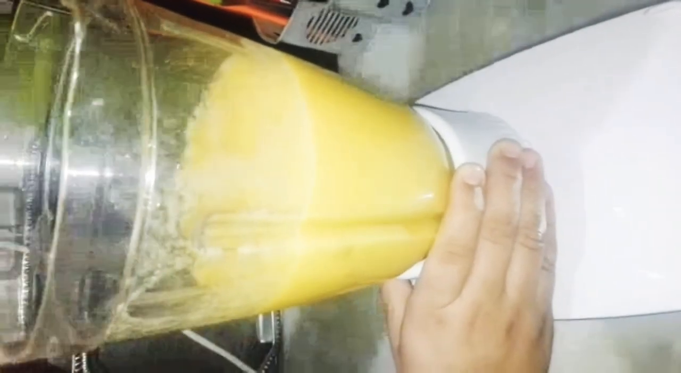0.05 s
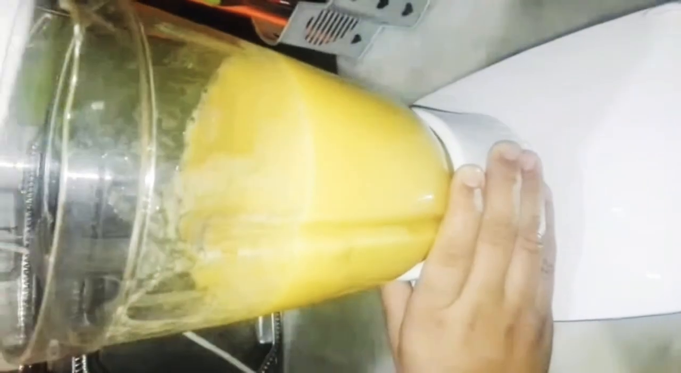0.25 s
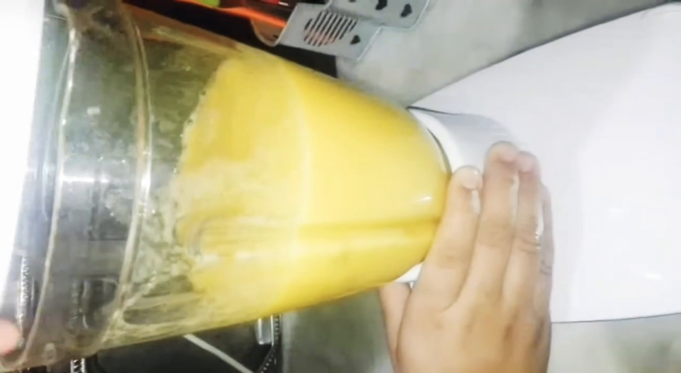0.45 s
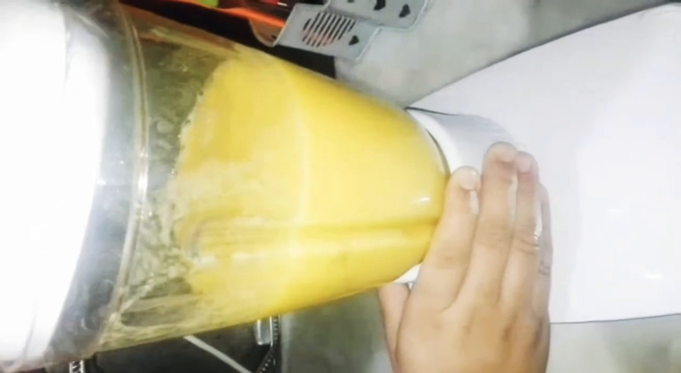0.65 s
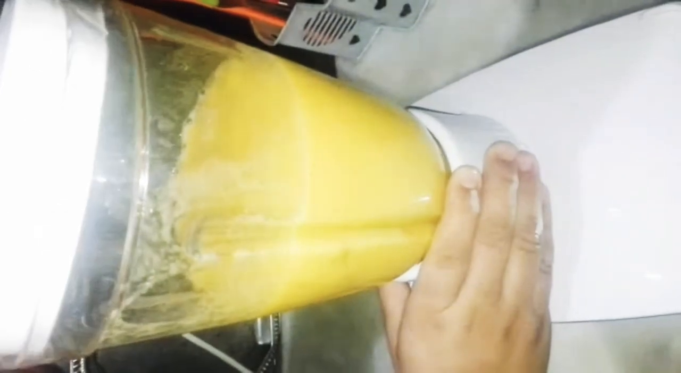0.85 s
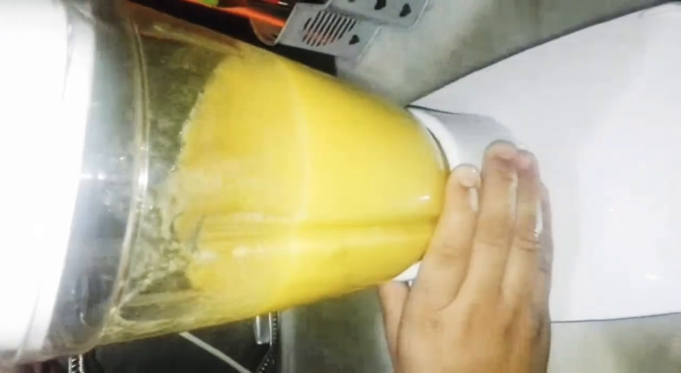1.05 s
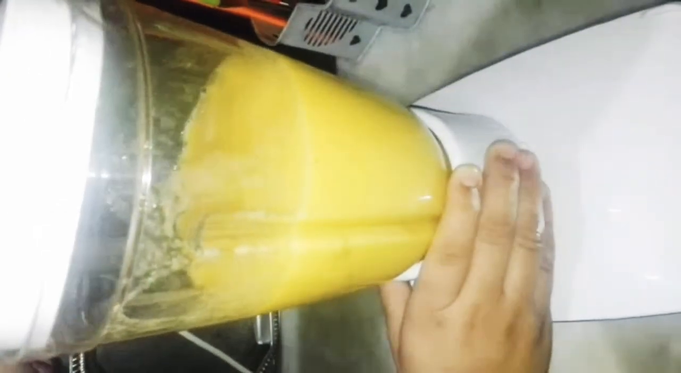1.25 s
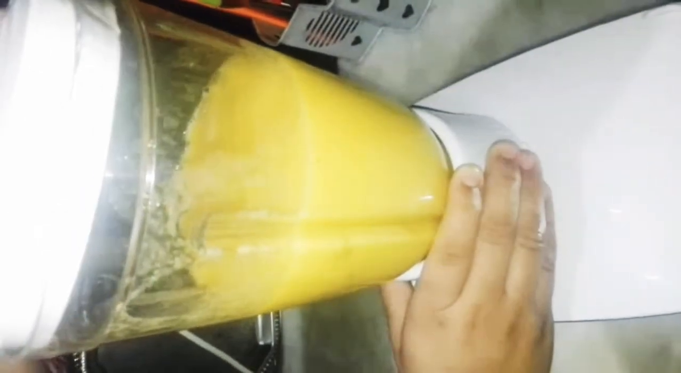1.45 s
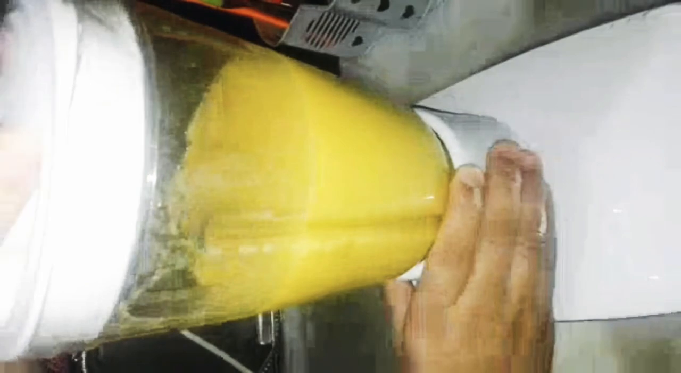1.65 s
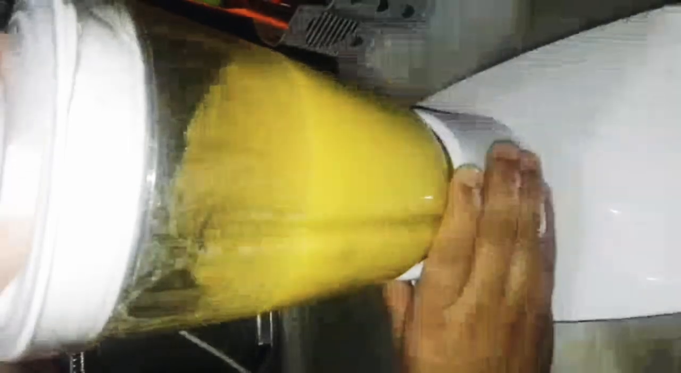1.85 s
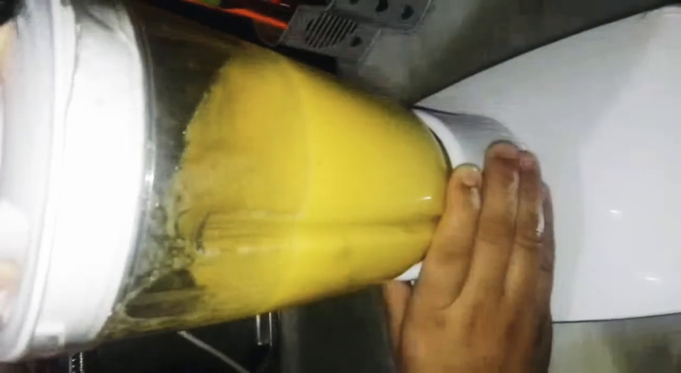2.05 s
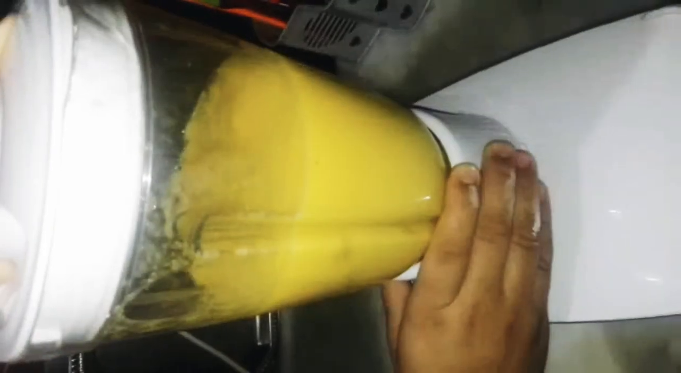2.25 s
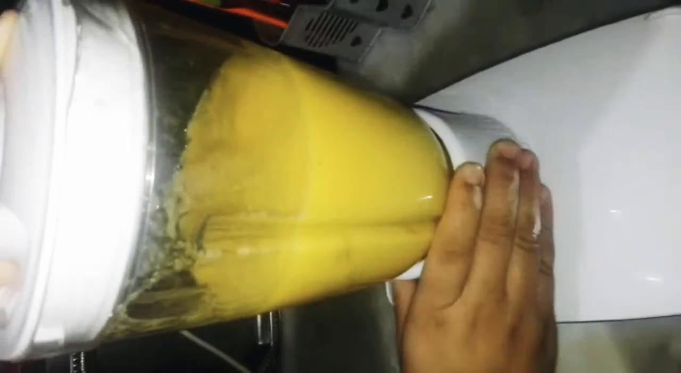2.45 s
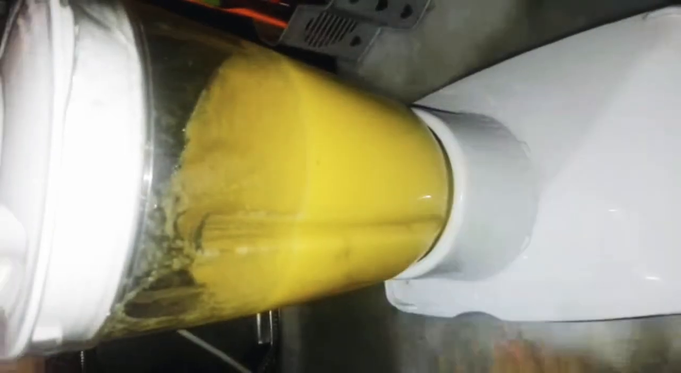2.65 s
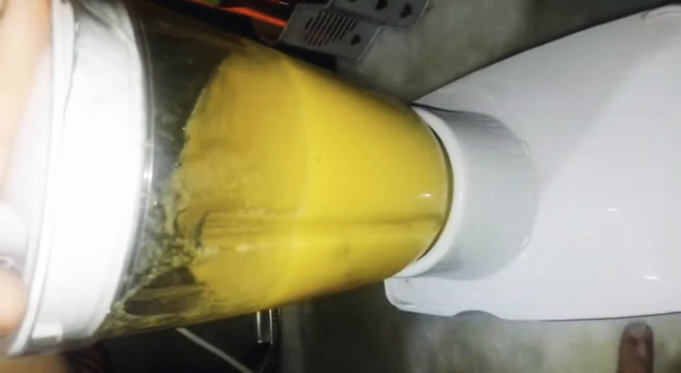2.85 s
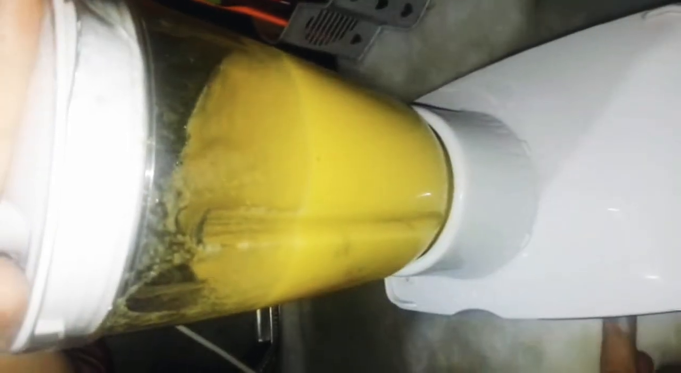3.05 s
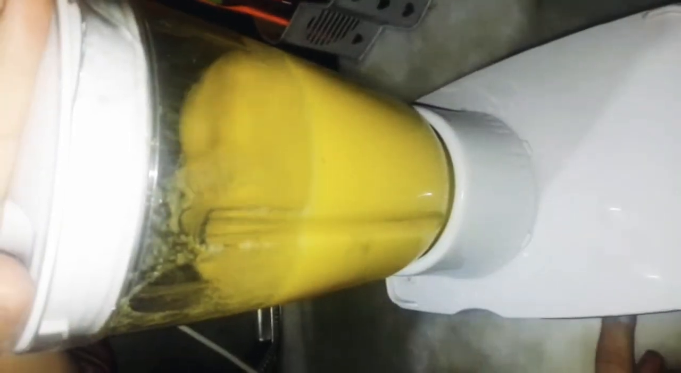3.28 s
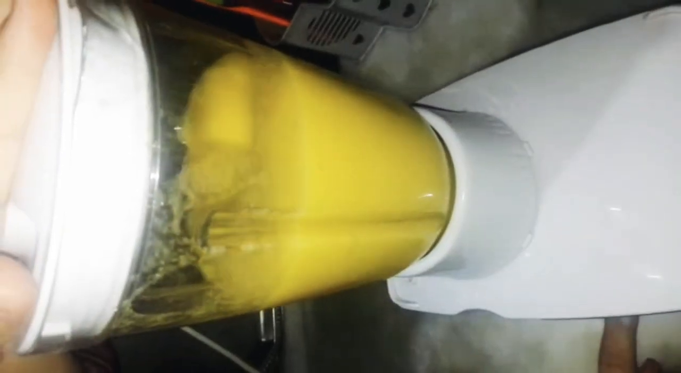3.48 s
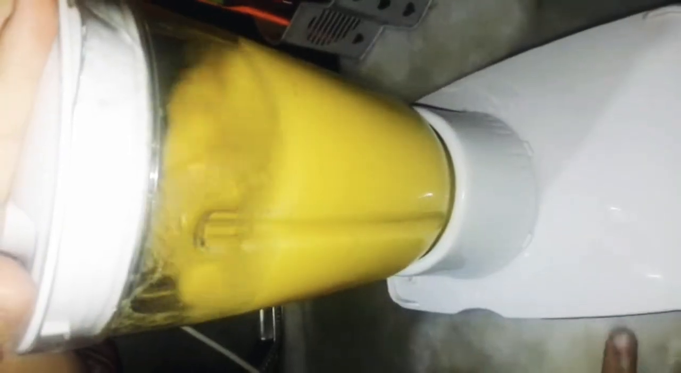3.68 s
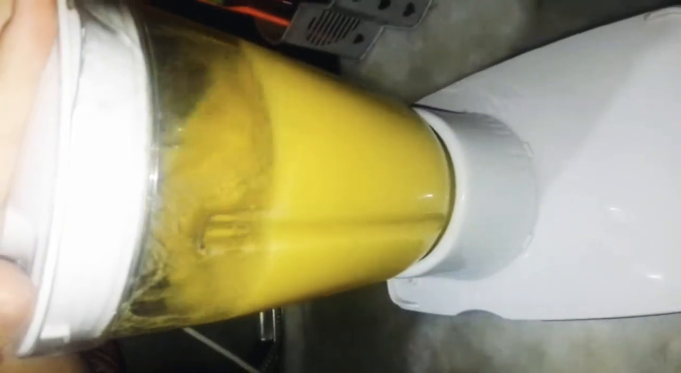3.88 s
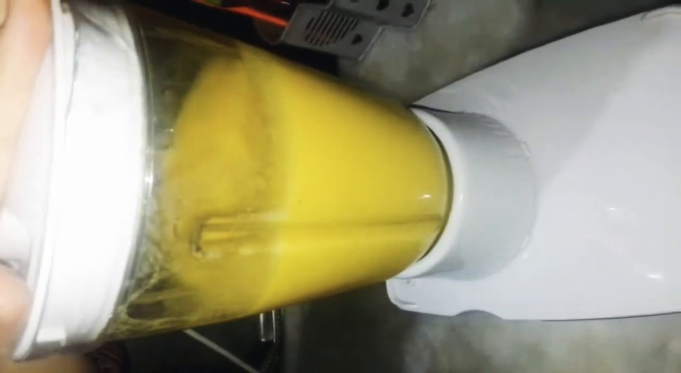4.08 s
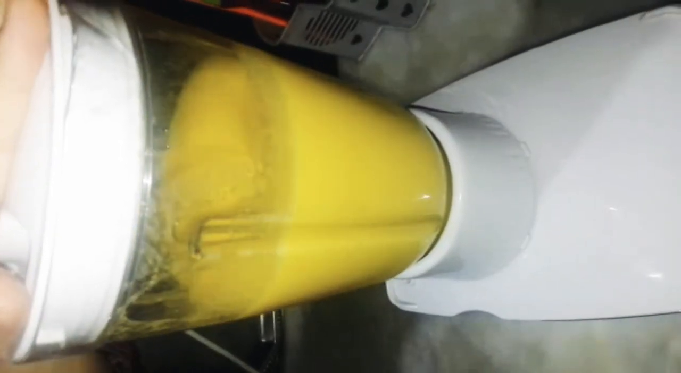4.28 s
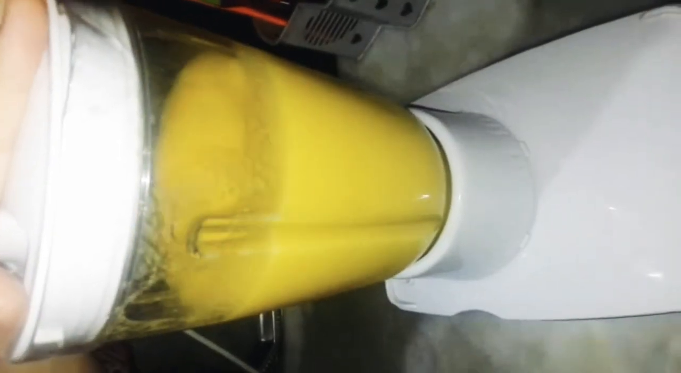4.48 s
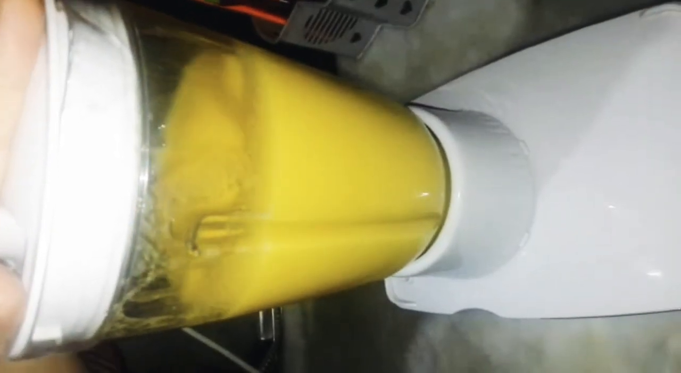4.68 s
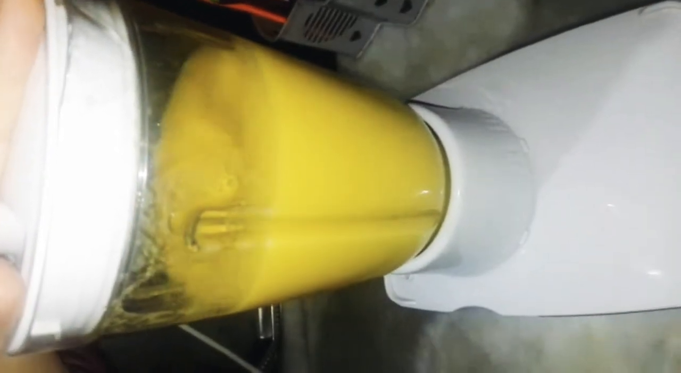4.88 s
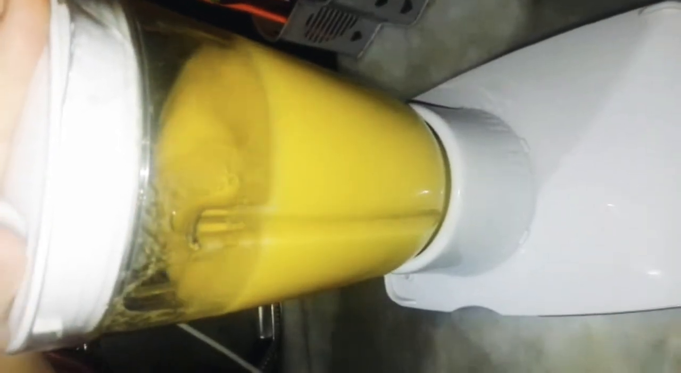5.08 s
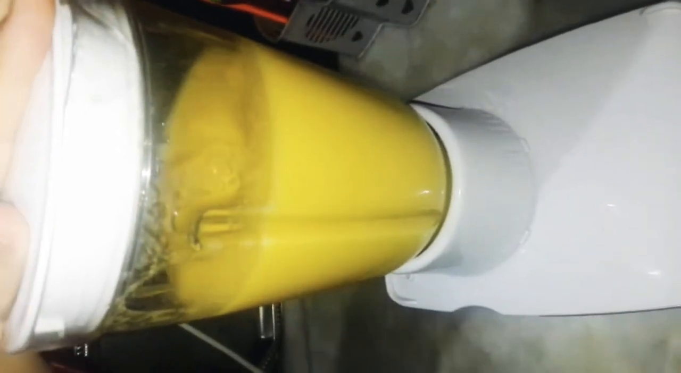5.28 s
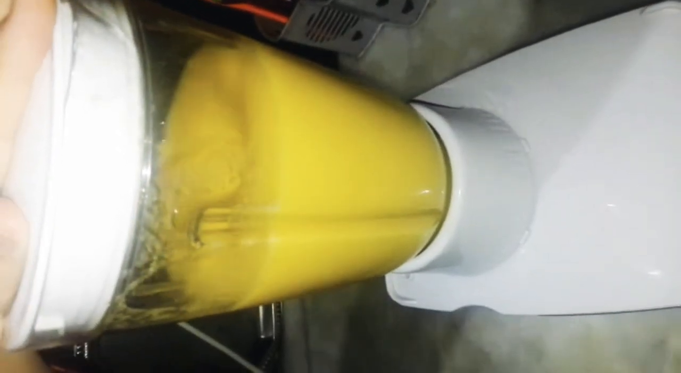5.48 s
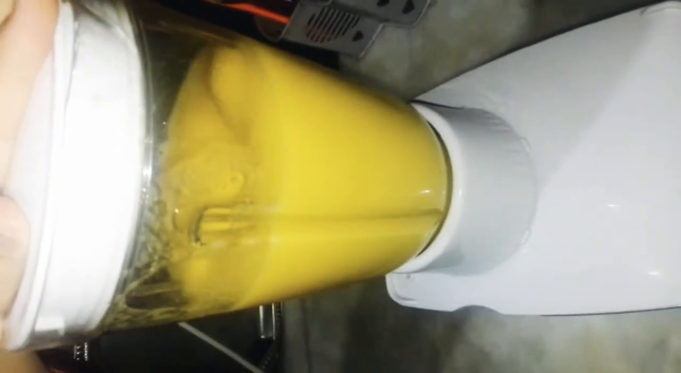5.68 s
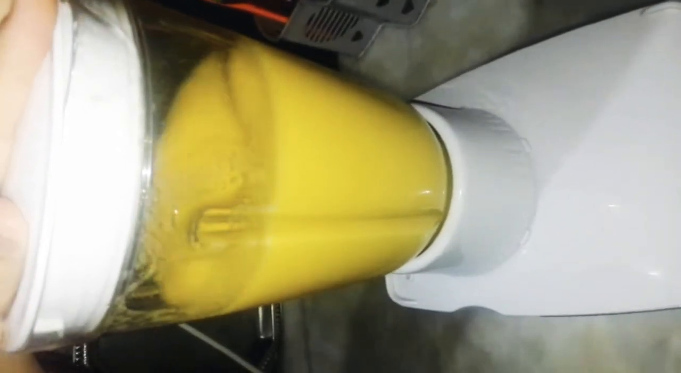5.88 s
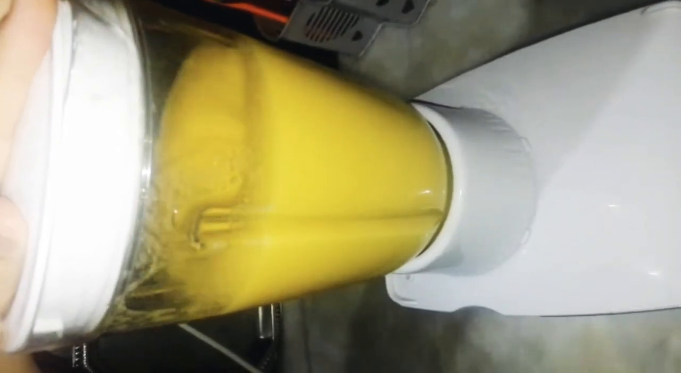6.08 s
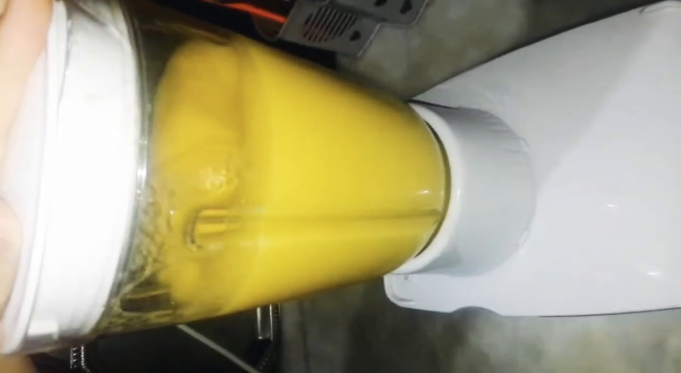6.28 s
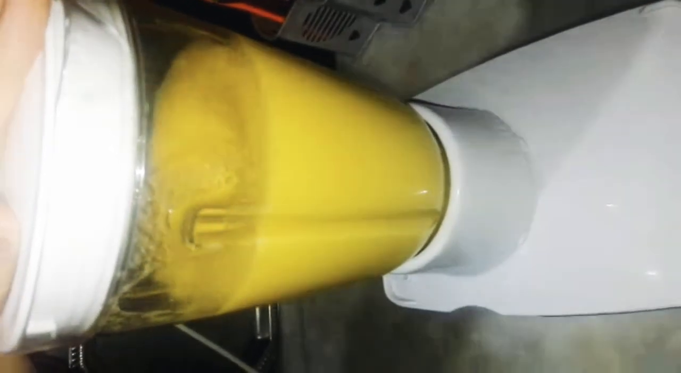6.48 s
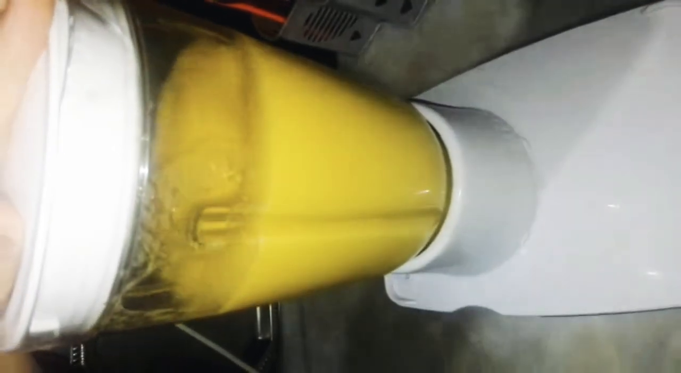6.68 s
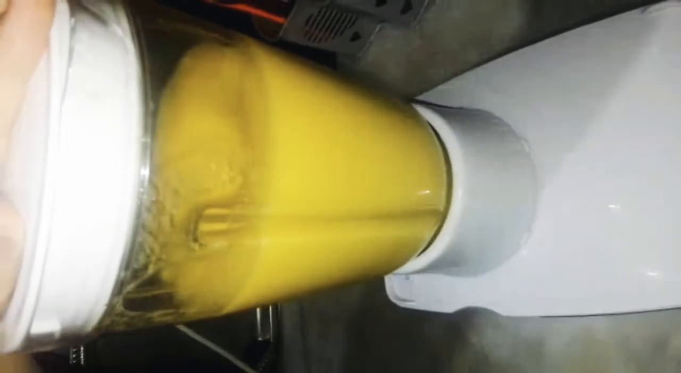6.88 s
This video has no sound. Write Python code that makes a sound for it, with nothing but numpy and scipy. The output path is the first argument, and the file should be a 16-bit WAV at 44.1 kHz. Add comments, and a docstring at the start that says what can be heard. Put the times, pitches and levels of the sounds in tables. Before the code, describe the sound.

Plastic lid knocks, creaks and clacks onto a full blender jar, then the switch clicks and a loud rattling blender crushes ice to the end.

```python
"""A small kitchen, heard close by: hands press a plastic lid onto a full blender jar with knocks, creaks and rubs.
Noise bursts excite the jar and its enclosed air; filtered noise in bursts of uneven grip makes the rubs.
Then the switch clicks and the blades start at once: random chips and blows rattle the housing through
its resonances, the base rumbles in narrow modes, slush hisses, and a band of noise is the motor's whistle."""
import sys
import numpy as np
from scipy import signal
from scipy.fft import rfft, irfft, next_fast_len
from scipy.io import wavfile
from scipy.ndimage import uniform_filter1d

SR = 44100
rng = np.random.default_rng(int(sys.argv[2]) if len(sys.argv) > 2 else 0)


def unload_audio(sound):
    """Save the sound as a 16-bit wav file, at the path given as the first command line argument."""
    columns = np.transpose(np.atleast_2d(sound))
    # keep every value between -1 and 1, then stretch to whole-number steps
    steps = np.round(np.clip(columns, -1, 1) * 32767)
    wavfile.write(sys.argv[1], SR, steps.astype(np.int16))


N = 305613
T = np.arange(N) / SR

# All source levels are relative, ahead of the mixing gains and the final rounding of peaks.
# quiet background spectrum: f/Hz, level/dB per Hz
QUIET_SPECTRUM = [(15, -32.5), (25, -1.5), (97, 2), (210, -4), (305, -4.5), (455, -15), (1870, -13),
                  (2570, -23), (3440, -16), (13400, -23), (14500, -39)]
QUIET_DB = -75
# left-right difference of the background: f/Hz, side-minus-mid level/dB
QUIET_DIFFERENCE = [(60, -35), (500, -18), (2400, -23), (4400, -8), (8000, -1.5), (14500, -7.5)]
# left-right difference of the foreground mix: f/Hz, side-minus-mid level/dB
FOREGROUND_DIFFERENCE = [(60, -48), (400, -38), (3800, -42), (5000, -14), (7000, -19), (8000, -14),
                         (10500, -10), (14500, -6)]
# reverberation of the kitchen: f/Hz, t60/s
ROOM_DECAYS = [(80, 0.37), (210, 0.46), (560, 0.28), (1470, 0.31), (3880, 0.29), (10200, 0.04)]
ROOM_DB, BLEND_ROOM_DB, BLEND_T60_S = -7, -5.5, 0.056

# fingers and lid rim sliding: start t/s, end t/s, level/dB before the swell, centre f/Hz, width/Hz
RUB_STROKES = [(.27, .55, -78, 3300, 230), (.32, .56, -80.5, 1900, 1100), (0.562, .66, -56.5, 1740, 900),
               (0.551, .66, -57.5, 3350, 700), (0.537, .66, -59, 490, 300), (0.93, 1.04, -74, 1900, 1700),
               (1.31, 1.62, -61, 420, 580), (1.38, 1.8, -61.5, 3800, 2000), (1.802, 1.85, -58, 1800, 2900),
               (2.485, 2.55, -62, 1700, 220), (2.48, 2.61, -69, 1460, 220), (2.675, 2.768, -71, 2700, 2000),
               (.7, 0.78, -75.5, 2970, 1500)]

# lid and jar knocks: t/s, thud level/dB, hollow level/dB, clack level/dB, tick level/dB, hollow f/Hz
LID_KNOCKS = [(.23, -50, -49, -39, -33, 670), (.301, -53, -53.5, -42, -44, 600),
              (.585, -53, -41.5, -39, -61, 547), (.614, -52, -42, -46, -59, 574),
              (0.634, -45, -29.5, -31, -40, 520), (.654, -31, -27, -11.5, -21, 577),
              (.857, -66, -52, -50, -75, 558), (.973, -49.5, -46, -70, -61, 366),
              (1.089, -47, -32, -29.5, -44.5, 275), (1.269, -62, -58, -64, -76, 287),
              (1.328, -43.5, -58, -53, -61, 376), (1.351, -46, -41.5, -42, -53.5, 505),
              (1.469, -53, -41, -40, -40.5, 212), (1.503, -26, -37, -12.5, -22, 629),
              (1.599, -48, -37, -25, -42, 395), (1.641, -39.5, -36, -23.5, -23, 362),
              (1.832, -50, -37, -28.5, -24.5, 470), (1.871, -51, -36.5, -36.5, -43, 205),
              (2.151, -51, -22.5, -14.5, -18, 320), (2.504, -55, -67, -46, -58, 373),
              (2.636, -70.5, -78, -69, -58, 273), (2.689, -30.5, -46, -53, -52, 256)]
# bands of thud, hollow, clack and tick: low f/Hz, high f/Hz
KNOCK_BANDS = [(70, 170), (170, 700), (700, 2400), (2400, 6000)]
# ringing modes of the jar: f/Hz, level/dB before weighting by decay, t60/s
JAR_MODES = [(110.4, 5, 0.28), (193.5, -5.5, 0.28), (289.6, -3, .16), (462.5, -5, 0.18), (580, -21, 0.33),
             (906, -15, 0.12), (1250, -15.5, .12), (1658, -4, 0.16), (2020, -8, 0.21), (2920, -27.5, 0.15),
             (3370, -5.5, .2)]
JAR_RING_DB, HOLLOW_DB, HOLLOW_T60_S = -2, -2.5, 0.13
CONTACT_AT_700_HZ_MS = 6.37  # decay constant of a burst whose band begins at 700 Hz

# the switch clicks and rattles under the finger: t/s, peak level/dB
SWITCH_CLICKS = [(2.993, -40.5), (3.051, -47), (3.07, -43.5), (3.109, -43)]
# resonances of the switch housing: f/Hz, width/Hz, level/dB
SWITCH_RESONANCES = [(306, 83, -2.5), (897, 180, 2.5), (1390, 110, 5.5), (2390, 380, -19)]

START_S, TOP_HZ = 3.143, 14250
# how hard the blades work: t/s, rattle level/dB
BLADE_LOAD = [(3.14, -20.5), (3.2, -18), (3.3, -12), (3.4, -11.5), (3.6, -15), (3.7, -23.5), (3.9, -23.5),
              (4.0, -12), (4.2, -16), (4.4, -17), (4.52, -22), (4.72, -16.5), (4.97, -25), (5.35, -17),
              (5.8, -19.5), (6.2, -22), (6.45, -19), (6.93, -18)]
# the hardest ice blows: t/s, peak level/dB
ICE_CRACKS = [(3.2038, -9), (3.2217, -3.5), (3.2392, 3.5), (3.3096, 2), (3.3606, 1.5), (3.4643, -9),
              (3.5129, -1.5), (3.69, -11), (3.7332, -3), (3.872, -5.5), (3.964, -5.5), (4.013, -4),
              (4.0706, -0.5), (4.328, 0), (4.4952, -4), (4.7818, -5), (5.0211, -9.5), (5.2611, -8),
              (5.5532, -5), (5.6313, -6), (5.7128, -4.5), (5.877, -11.5), (6.43, -7.5), (6.5515, -9),
              (6.8768, -9), (6.9084, -6)]
# resonances of the blender housing: f/Hz, width/Hz, level/dB
HOUSING_MODES = [(846, 51, -25.5), (975.6, 96.4, 1.5), (1392, 197, -11), (1770, 42, -1.5), (1889, 116, 1),
                 (2120, 330, -7)]
HOUSING_REST_DB = -14  # unresonant share
# resonances of the base: f/Hz, width/Hz, level/dB
BASE_MODES = [(68.4, 6.4, -1.5), (104.7, 19.3, 2.5), (138.8, 9.2, 2.5), (199.6, 5.9, -5.5),
              (267, 37, -11.5), (338, 36, -7), (472.2, 4.9, 3.5)]
# level of the bass over the rattle: t/s, level/dB
BASE_RUMBLE = [(3.14, -7), (3.3, -11.5), (3.58, -10), (4.05, -19), (4.35, -14.5), (4.7, -19), (5.1, -17),
               (5.7, -18.5), (6.2, -16), (6.7, -18.5), (6.93, -11.5)]
# spectrum of the slush spray: f/Hz, level/dB per Hz
GRIT_SPECTRUM = [(1900, -4), (2500, 2), (2800, 7.5), (3250, 8.5), (3600, 4), (3950, 6.5), (4650, -0.5),
                 (5600, 4), (6550, -5.5), (7800, -6.5), (9000, -12), (10800, -18.5), (14500, -21)]
CHIPS_PER_S, CHIP_SPREAD_DB = 1100, 2.5
LUMPS_PER_S, LUMP_DB, LUMP_SPREAD_DB = 9, 7.5, 3  # inverse median gap; level and spread over the load
GRIT_DB, GRIT_SHARE, GRIT_FLICKER_DB = -17.5, .76, 1.5  # at 0 dB load; share of the load's dB followed
# the whistle sets in once the motor is up to speed
WHISTLE_HZ, WHISTLE_AT_S, WHISTLE_RISE_S = (6880, 7240), 3.59, 0.057
WHISTLE_DB, WHISTLE_SHARE = -30, 0.31  # at 0 dB load; share of the load's dB followed


def undb(db):
    """Amplitude ratio: twenty decibels are a factor of ten."""
    return 10 ** (np.asarray(db) / 20)


def level(x, db):
    """Scaling to a given root-mean-square level."""
    return x * undb(db) / np.sqrt(np.mean(x ** 2))


def band(x, lo_hz, hi_hz, order=2):
    """Butterworth band-pass: a maximally flat passband."""
    return signal.sosfilt(signal.butter(order, [lo_hz, hi_hz], "bandpass", fs=SR, output="sos"), x)


def peak(x, hz, width_hz):
    """Simple resonance: unit gain at the centre, with decay set by the width."""
    return signal.lfilter(*signal.iirpeak(hz, hz / width_hz, SR), x)


def resonate(x, modes):
    """Modal superposition: a body answers as a sum of weighted resonances."""
    return sum(undb(db) * peak(x, hz, width_hz) for hz, width_hz, db in modes)


def colour(x, points):
    """Spectral weighting: gain in dB is interpolated over log frequency."""
    hz, db = np.transpose(points)
    n = next_fast_len(N)
    f = np.maximum(np.arange(n // 2 + 1) * SR / n, 1)
    gain = undb(np.interp(np.log(f), np.log(hz), db))
    return irfft(rfft(x, n) * gain, n)[:N]


def walk(rate):
    """Random modulation: independent normal values, rate per second, joined by linear slews."""
    k = int(SR / rate)
    return uniform_filter1d(np.repeat(rng.standard_normal(N // k + 1), k), k)[:N]


def blows(seconds, sizes, contact_ms):
    """Impulsive excitation: noise bursts die exponentially, with the contact time as time constant."""
    out, t = np.zeros(N + SR), np.arange(SR // 20) / SR
    for s, size, ms in zip(seconds, sizes, contact_ms):
        i = int(s * SR)
        out[i:i + len(t)] += size * rng.standard_normal(len(t)) * np.exp(-t * 1000 / ms)
    return out[:N]


def quiet_background():
    """Stationary noise: independent mid and side signals share a spectrum, then the side is weighted."""
    mid, side = [colour(rng.standard_normal(N), QUIET_SPECTRUM) for _ in range(2)]
    gain = undb(QUIET_DB) / mid.std()
    return gain * mid, gain * colour(side, QUIET_DIFFERENCE)


def linger(x, t60):
    """Exponential energy decay: the envelope of x falls by 60 dB in t60."""
    keep = np.exp(-2 * np.log(1000) / t60 / SR)
    return np.sqrt(signal.lfilter([1 - keep], [1, -keep], x ** 2))


def diffuse(x, decays):
    """Diffuse field: each half-octave's energy fades by its own decay, carried on fresh noise."""
    hz, t60 = np.transpose(decays)
    out = 0
    for f in 62.5 * np.sqrt(2) ** np.arange(17):
        edges = f / 2 ** .25, f * 2 ** .25
        band_t60 = np.interp(np.log(f), np.log(hz), t60)
        fading = linger(band(x, *edges, order=3), band_t60)
        carrier = level(band(rng.standard_normal(N), *edges, order=3), 0)
        out = out + fading * carrier
    return out


def room(x):
    """Reverberation: the diffuse tail begins with the first walls, 5 ms after the direct sound."""
    lag = int(.005 * SR)
    return np.concatenate([np.zeros(lag), diffuse(x, ROOM_DECAYS)[:N - lag]])


def rubs():
    """Stick and slip: uneven noise excites one steep resonance, swelling and fading."""
    out, grip = np.zeros(N), undb(3.5 * walk(70))
    for start, end, db, hz, width_hz in RUB_STROKES:
        a, b = int(start * SR), int(end * SR)
        slip = rng.standard_normal(b - a) * grip[a:b]
        squeak = peak(peak(slip, hz, width_hz), hz, 2 * width_hz)
        swell = np.sqrt(np.sin(np.pi * np.arange(b - a) / (b - a)))
        out[a:b] += level(squeak, db) * swell
    return out + undb(ROOM_DB - 11.5) * room(out)


def knock_impacts(s, bands_db):
    """Impact spectrum: each knock pushes every band separately, the low bands for longer."""
    hit = 0
    for (lo, hi), db in zip(KNOCK_BANDS, bands_db):
        contact_ms = CONTACT_AT_700_HZ_MS * (700 / lo) ** 0.39
        burst = band(blows(s, undb(db), np.full(len(s), contact_ms)), lo, hi)
        # a narrow band takes a smaller share of the burst
        hit = hit + burst * np.sqrt(SR / 8 / (hi - lo))
    hit = band(hit, 66.0, 9200, order=1)
    return hit + undb(ROOM_DB) * room(hit)


def jar_ring(hit):
    """Free vibration: the width of each jar mode follows from its decay time."""
    ring = 0
    for hz, db, t60 in JAR_MODES:
        mode = peak(hit, hz, np.log(1000) / np.pi / t60)
        ring = ring + undb(db) * mode * np.sqrt(t60 / 0.011)
    return undb(JAR_RING_DB) * ring


def enclosed_air(s, db, hollow_hz):
    """Cavity resonance: a decaying sine changes pitch with the gap under the lid."""
    air, t = np.zeros(N), np.arange(SR // 3) / SR
    decay = np.exp(-np.log(1000) * t / HOLLOW_T60_S)
    for at, size, hz in zip((s * SR).astype(int), undb(db + HOLLOW_DB), hollow_hz):
        air[at:at + len(t)] += size * np.sin(2 * np.pi * hz * t) * decay
    return air + undb(-4.5) * room(air)


def knocks():
    """Impact and free vibration: the struck jar and the air in it ring on after each knock."""
    s, *bands_db, hollow_hz = np.transpose(LID_KNOCKS)
    hit = knock_impacts(s, bands_db)
    return hit + jar_ring(hit) + enclosed_air(s, bands_db[1], hollow_hz)


def switch():
    """Forced resonance: small plastic clicks and a faint scratch ring the switch housing."""
    s, db = np.transpose(SWITCH_CLICKS)
    clicks = blows(s, undb(db), np.full(len(s), 6.5))
    scratch = level(rng.standard_normal(N), -56.5) * (T > s[0]) * (T < START_S)
    return undb(10.5) * band(resonate(clicks + scratch, SWITCH_RESONANCES), 190, 2200)


def ice_impacts(load_db, load):
    """Random impacts: clumped chips follow the load, joined by set cracks and lumps at uneven gaps."""
    arrivals = rng.random(N) < CHIPS_PER_S / SR
    sizes = undb(CHIP_SPREAD_DB * rng.standard_normal(N))
    chips = arrivals * sizes * rng.choice([-1, 1], N)
    chips = level(chips * undb(2.1 * walk(60)), 0) * load
    s, db = np.transpose(ICE_CRACKS)
    gap_chance, size_chance = rng.standard_normal(size=(60, 2)).T
    at = START_S + np.cumsum(np.exp(.5 * gap_chance)) / LUMPS_PER_S
    lump_db = np.interp(at, T, load_db) + LUMP_DB + LUMP_SPREAD_DB * size_chance
    heard = at < T[-1]
    s, db = np.append(s, at[heard]), np.append(db, lump_db[heard])
    ice = chips + undb(-3.0) * blows(s, undb(db), np.full(len(s), 3.5))
    # the kitchen hands each blow back as a fading wash
    return ice + undb(BLEND_ROOM_DB) * linger(ice, BLEND_T60_S) * rng.standard_normal(N)


def housing_rattle(ice):
    """Modal response: ice blows ring the housing, with a weaker unresonant part."""
    dull = band(ice, 560, 2450, order=4)
    return resonate(dull, HOUSING_MODES) + undb(HOUSING_REST_DB) * dull


def base_rumble(ice, load):
    """Low-frequency resonance: blows and steady shaking drive the narrow modes of the base."""
    drive = ice + level(rng.standard_normal(N), 5.0) * load
    shake = band(drive, 50, 1440) * undb(np.interp(T, *np.transpose(BASE_RUMBLE)))
    return resonate(shake, BASE_MODES) + undb(-21) * shake


def slush_grit(ice, load_db, load):
    """Turbulent noise: slush sprays on between the blows, its level following part of the load."""
    spray = undb(-1.0) * ice + level(rng.standard_normal(N), -5.0) * load
    # the spray already carries the whole load
    grit = undb(GRIT_DB + (GRIT_SHARE - 1) * load_db + GRIT_FLICKER_DB * walk(25))
    return colour(spray * grit, GRIT_SPECTRUM)


def motor_whistle(load_db, on):
    """Narrow-band noise: a wavering whistle rises along a logistic curve and follows part of the load."""
    waver = undb(1.5 * walk(40) + 1.5 * walk(5))
    air = level(band(rng.standard_normal(N) * waver, *WHISTLE_HZ, order=3), 0)
    rise = 1 / (1 + np.exp((WHISTLE_AT_S - T) / WHISTLE_RISE_S))
    return air * undb(WHISTLE_DB + WHISTLE_SHARE * load_db) * on * rise


def blender():
    """Common excitation: one blade load governs chips, base, spray and whistle together."""
    load_db = np.interp(T, *np.transpose(BLADE_LOAD))
    on = np.clip((T - START_S) / 0.0024, 0, 1)
    load = undb(load_db) * on
    ice = ice_impacts(load_db, load)
    rattle = undb(9.5) * housing_rattle(ice)
    base = undb(14.0) * base_rumble(ice, load)
    grit = undb(4.5) * slush_grit(ice, load_db, load)
    return rattle + base + grit + motor_whistle(load_db, on)


def scene():
    """Superposition: foreground and background add in mid and side, then form left and right."""
    quiet_mid, quiet_side = quiet_background()
    mid = rubs() + knocks() + switch() + blender()
    # the bass is nearly the same left and right, the treble differs
    side = colour(diffuse(mid, [(60, .03), (14000, .015)]), FOREGROUND_DIFFERENCE)
    mid, side = mid + quiet_mid, side + quiet_side
    return np.array([mid + side, mid - side])


def record(dry):
    """Saturation and low-pass filtering: the phone rounds the loudest peaks and cuts the top."""
    cut = signal.ellip(10, .2, 70, TOP_HZ, fs=SR, output="sos")
    rounded = np.clip(1.2 * np.tanh(dry), -.96, .96)
    return signal.sosfilt(cut, rounded)


dry = scene()
out = record(dry)
unload_audio(out)
```